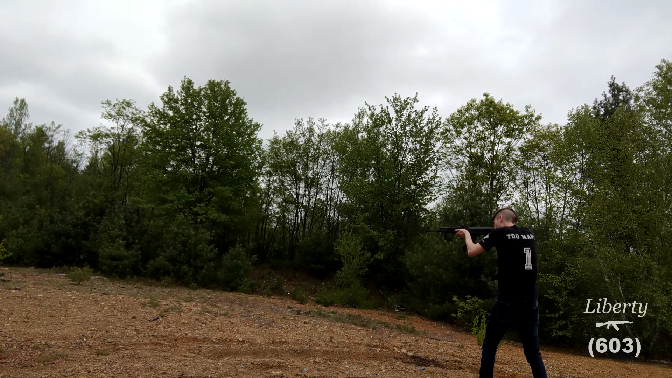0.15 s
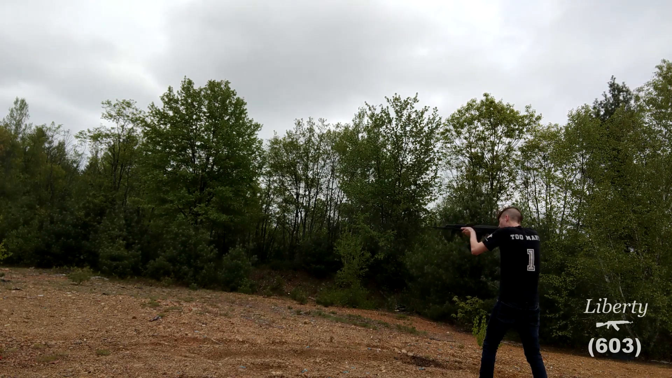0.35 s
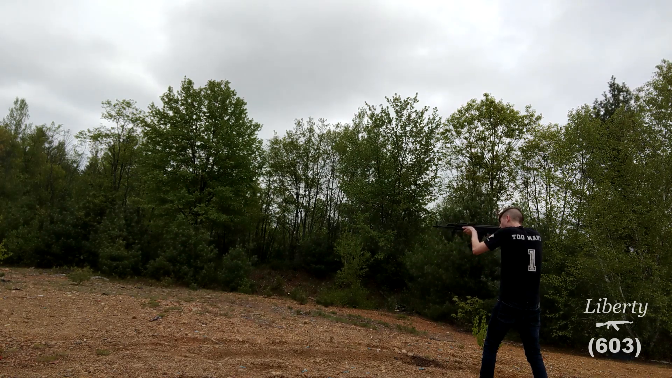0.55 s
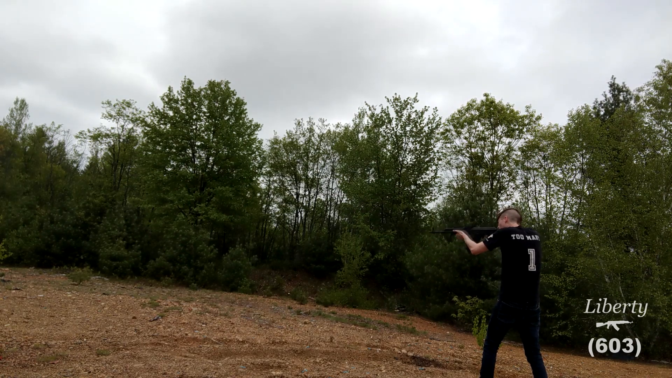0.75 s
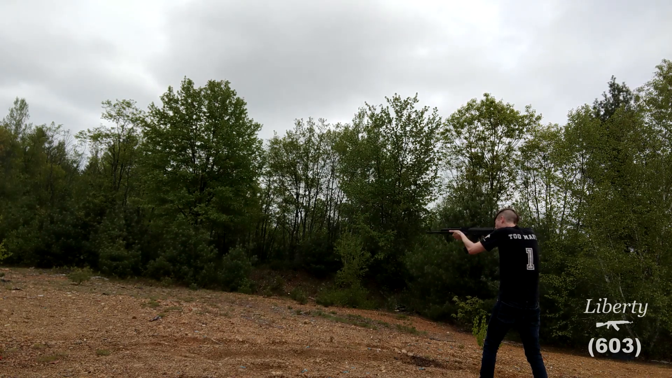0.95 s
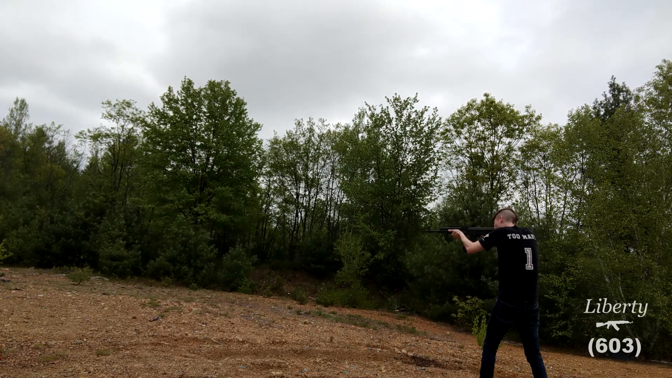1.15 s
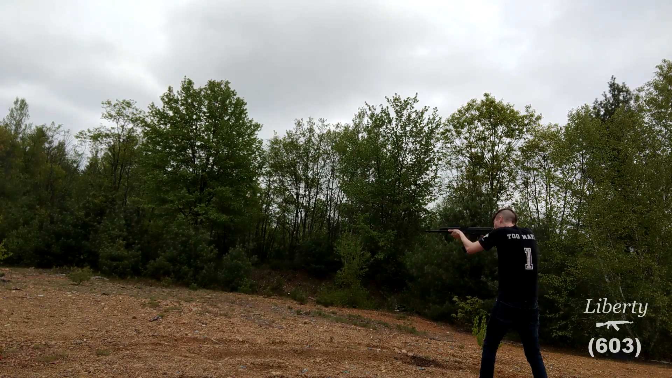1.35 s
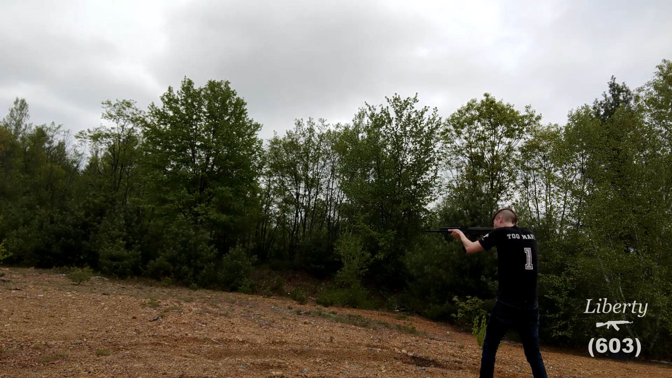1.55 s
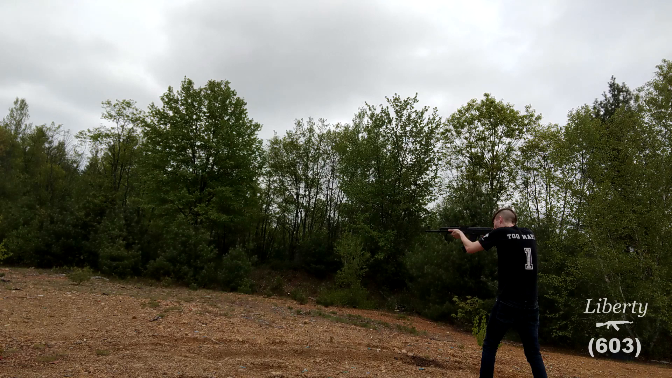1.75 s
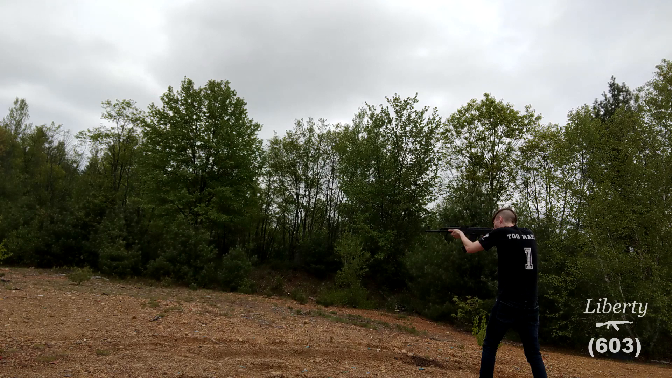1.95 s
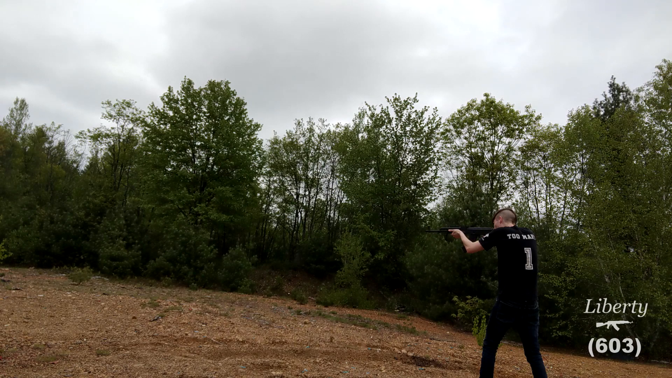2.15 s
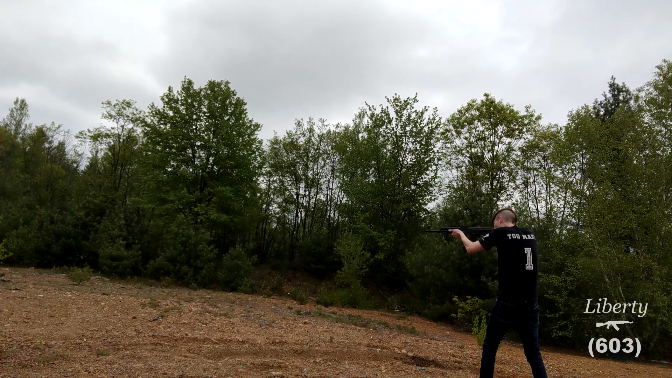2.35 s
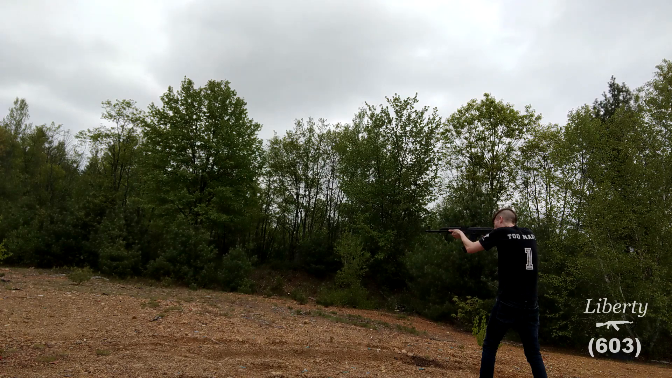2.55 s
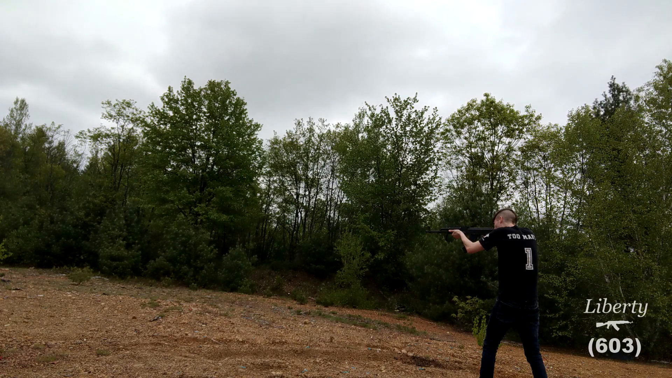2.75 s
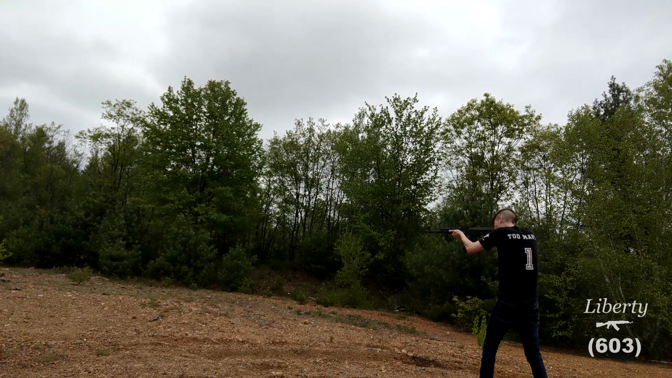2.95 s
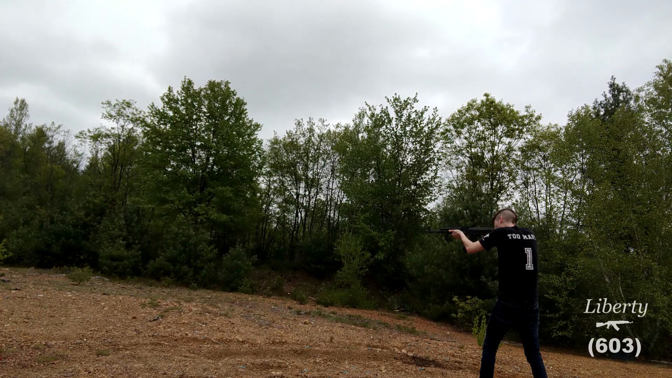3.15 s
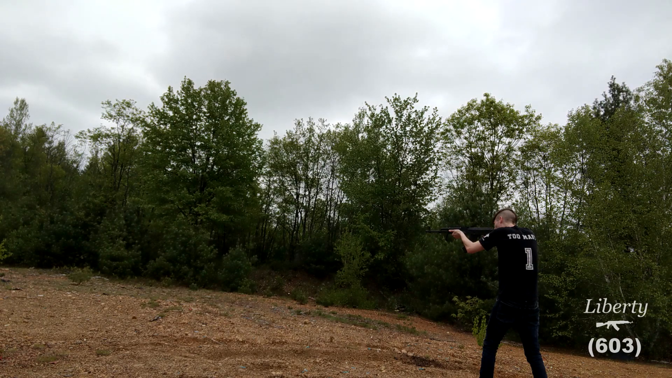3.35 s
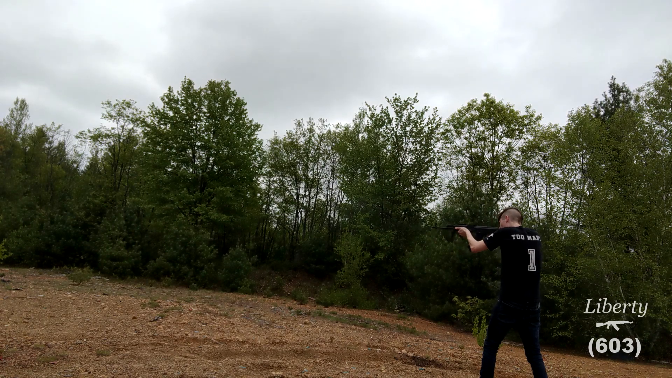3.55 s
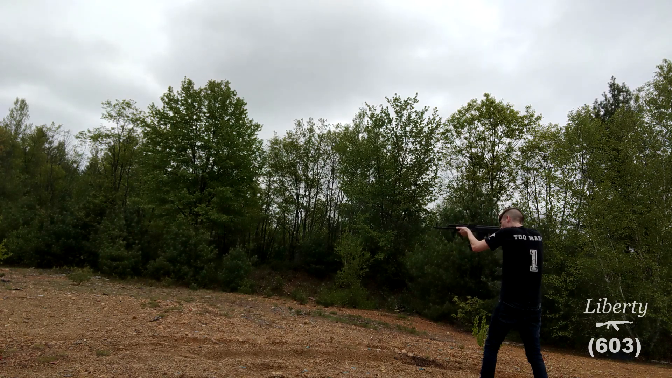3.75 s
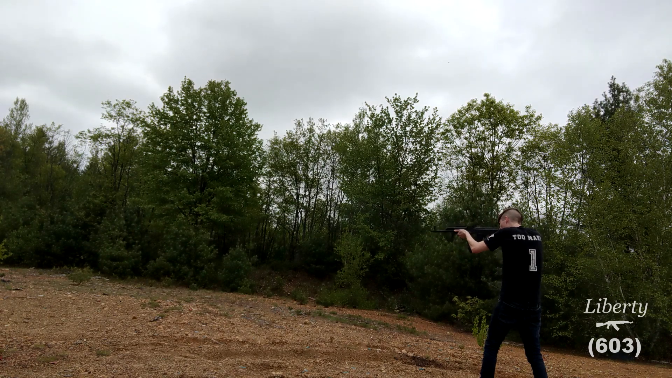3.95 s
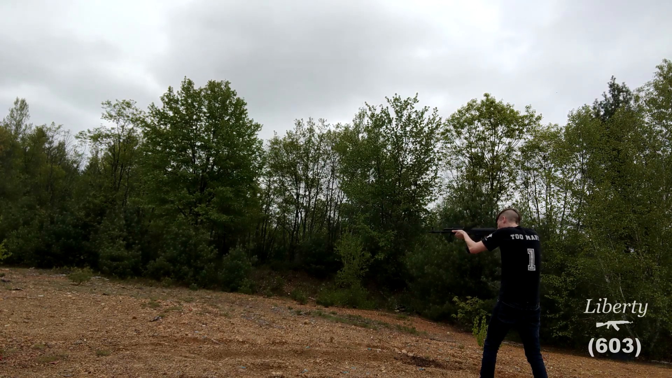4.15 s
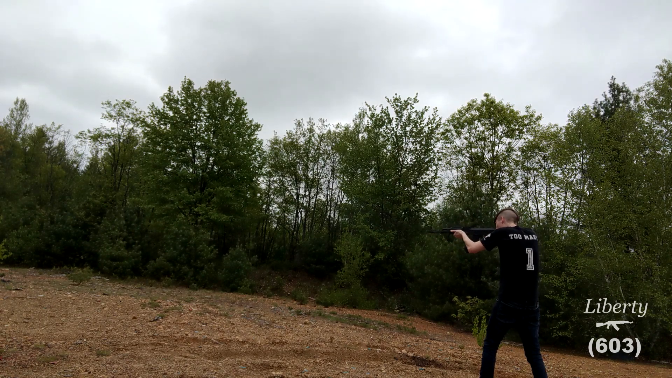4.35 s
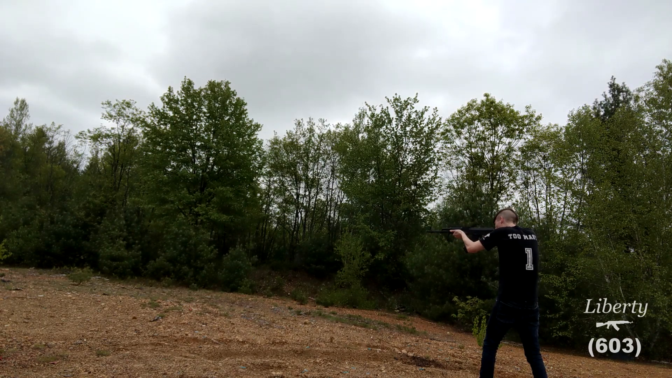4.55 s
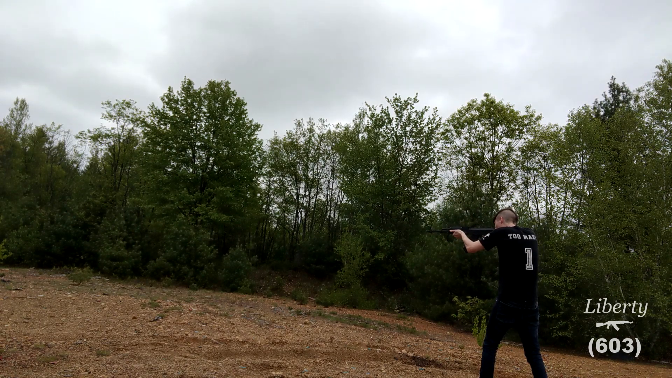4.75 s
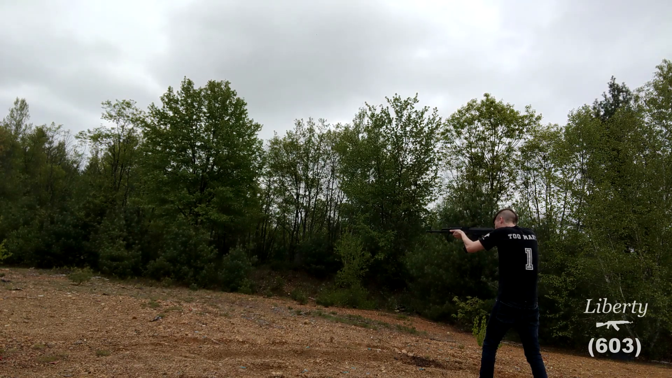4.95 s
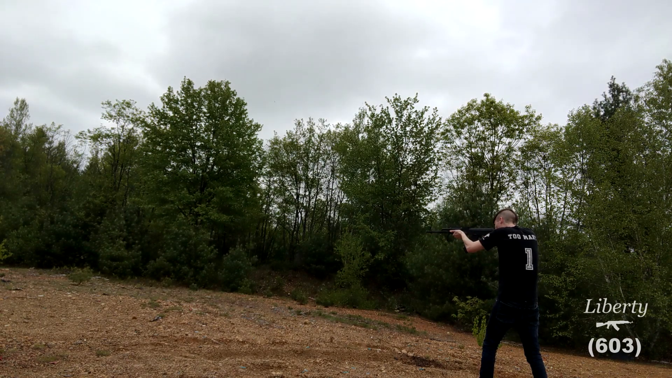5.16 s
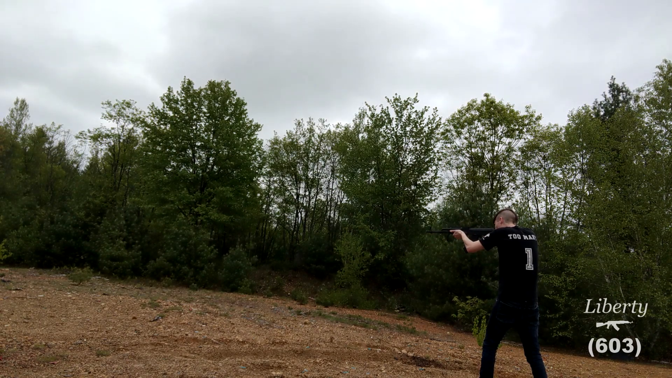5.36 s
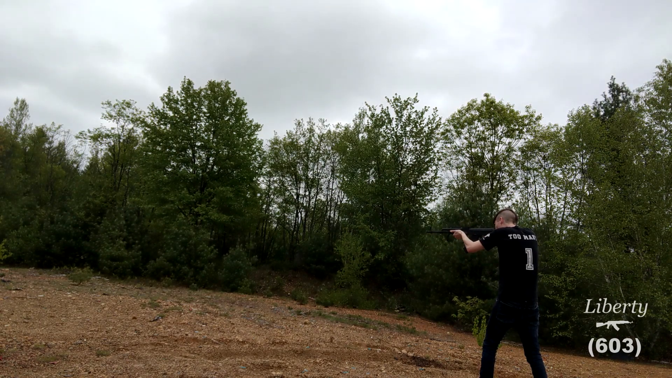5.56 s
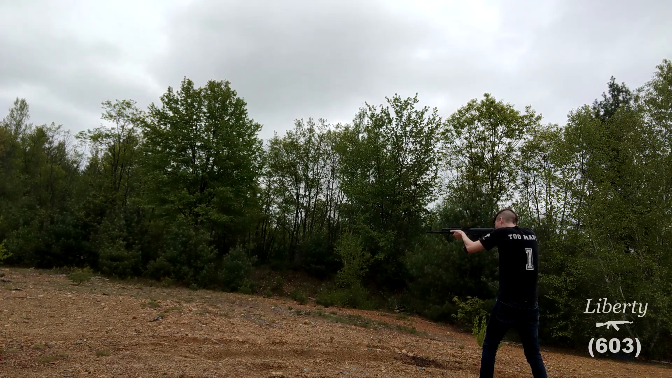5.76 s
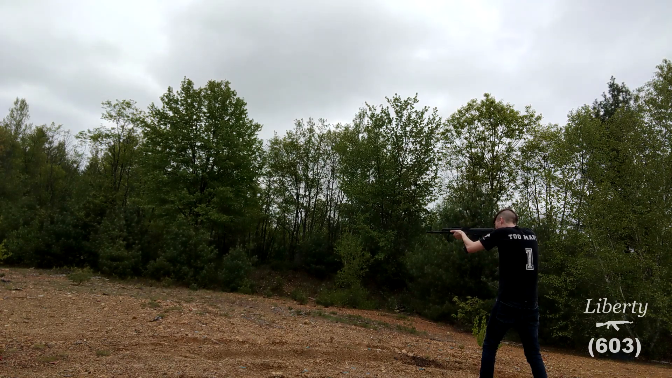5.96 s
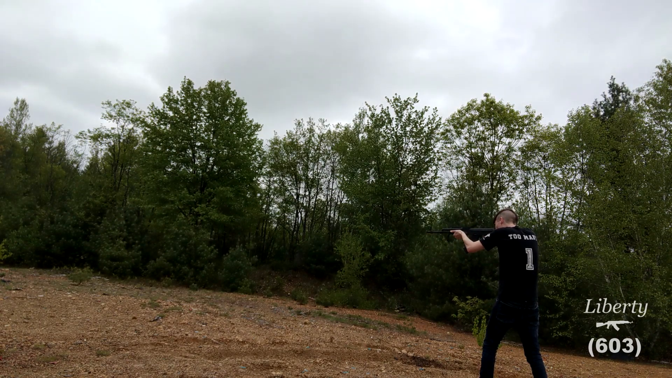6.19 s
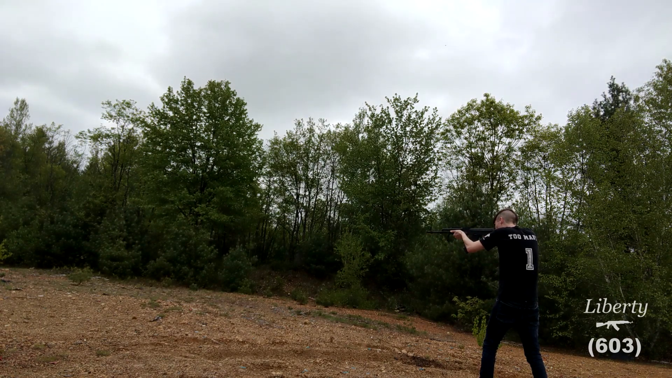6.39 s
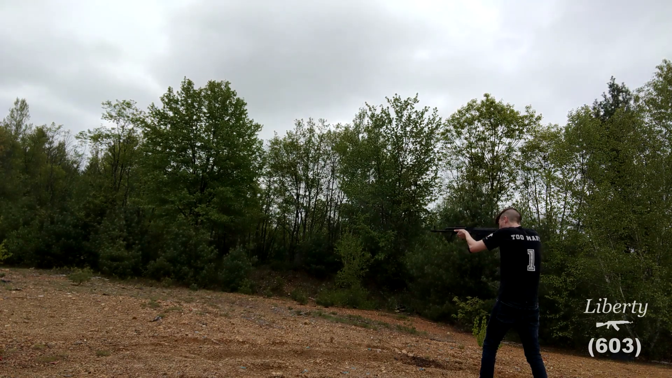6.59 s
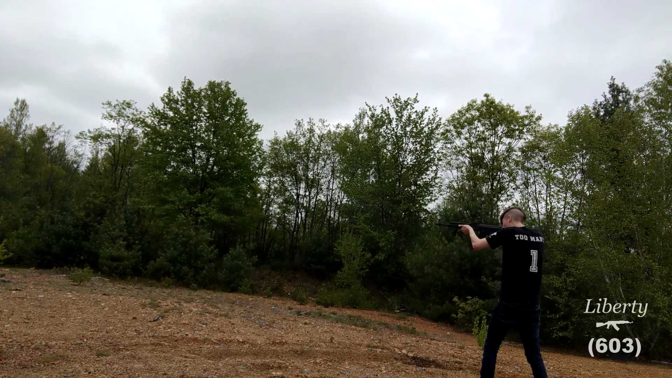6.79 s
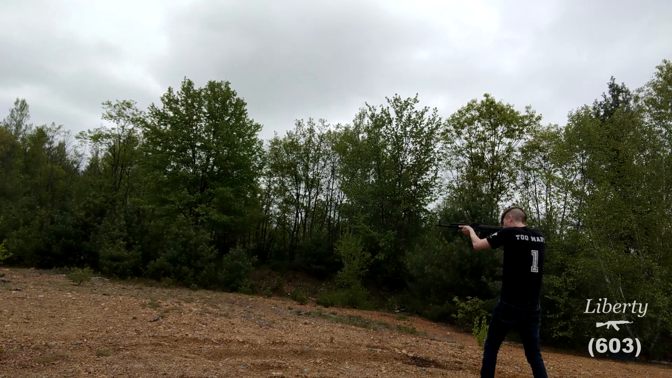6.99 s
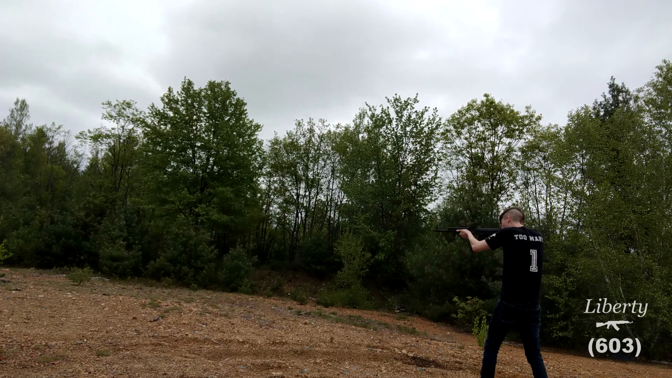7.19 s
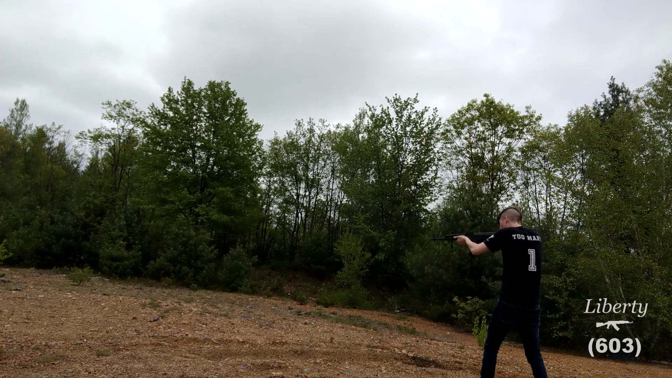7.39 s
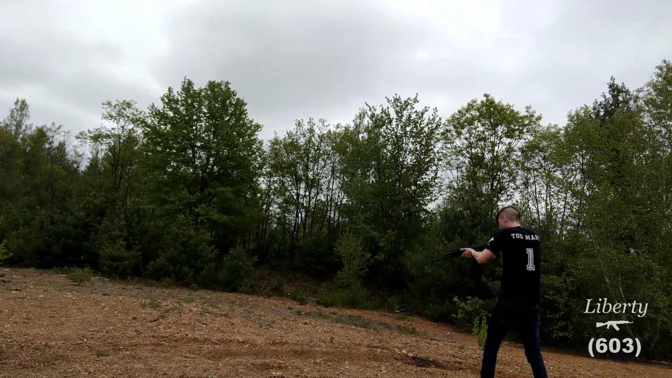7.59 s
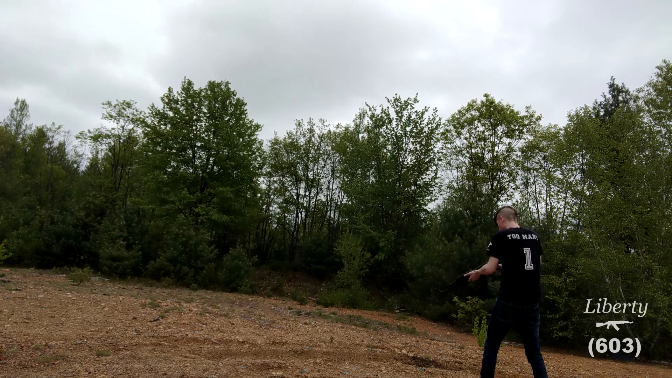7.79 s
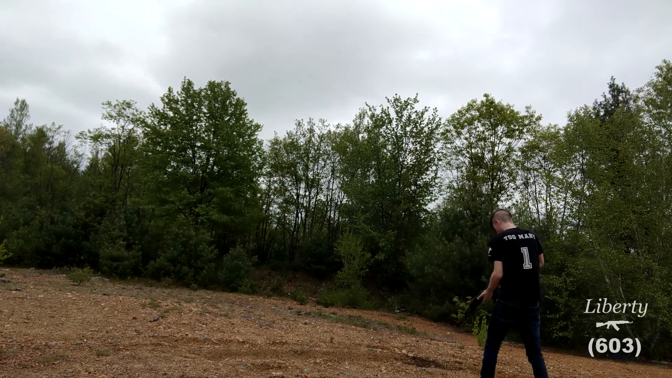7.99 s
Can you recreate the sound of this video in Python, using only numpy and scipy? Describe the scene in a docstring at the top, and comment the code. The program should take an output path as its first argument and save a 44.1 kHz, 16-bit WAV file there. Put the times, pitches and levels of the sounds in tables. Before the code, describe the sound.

Three single rifle shots sound on a gravel range surrounded by forest, a few metres from a small microphone that overloads on each blast. The first comes at about 0.3 seconds and the second at 3.5, both with a low thump; the third, at 6.6, has less bass. Each slaps back at once from an earth bank with a thin snap, scatters in the trees, then rolls away over distant hills for two to three seconds, with dull knocks in the echo.

About a second after each shot, a spent brass case bounces on the stones with a faint, high tinkle: around 1.5 seconds, from 4.6 to 4.9, and at 7.6 and 8.0. Soft low bumps fall at 1.2 and 4.5 seconds, and a small dry click at 5.3. A faint, steady outdoor hush lies underneath throughout.

```python
"""A gravel range ringed by forest: three rifle shots, a few metres from a small microphone that overloads.
Each blast slaps back from an earth bank, scatters in the tree line and the woods, and rolls away over
far hills. About a second later the spent brass case tinkles on the stones.
Two soft bumps, a dry click and a faint outdoor hush lie underneath."""
import sys
import numpy as np
from scipy import signal
from scipy.fft import rfft, irfft
from scipy.io import wavfile
from scipy.ndimage import uniform_filter1d, map_coordinates

SR = 44100
rng = np.random.default_rng(int(sys.argv[2]) if len(sys.argv) > 2 else 0)


def generate_wav(signal):
    """Clip the signal to [-1, 1] and save it as 16-bit WAV at the path in sys.argv[1]."""
    frames = np.transpose(np.atleast_2d(signal))
    scaled = np.clip(frames, -1, 1) * 32767
    pcm = np.round(scaled).astype(np.int16)
    wavfile.write(sys.argv[1], SR, pcm)


N = 354105
TIME = np.arange(N) / SR

# The breeze carries each shot differently: (time [s], blast gain [dB], boom gain [dB],
# woods gain [dB], woods lag [s], hills gain [dB], hills tilt [dB/octave])
SHOTS = [(.3180, -4.5, 1.5, 3, .004, 2.5, 0.18), (3.5081, -3.5, 4.5, -1, .03, 0.5, -0.5),
         (6.6306, -4.5, -11.5, -2, .05, 0, -1.15)]
# Microphone housing resonances and notches: (frequency [Hz], gain [dB])
HOUSING_RESPONSE = [(500, -0.5), (950, -2), (1220, 1), (1500, -1), (1800, 2), (2050, 0), (2300, 0),
                    (3600, 0), (4150, -2), (5000, 0.5), (7200, 0.5), (8100, -2), (9000, 1.5), (10500, -1)]


def rifle(shared_power=0.56, hammer_lead_s=.0067):
    """Every shot meets the same landscape, so its echoes repeat in part; moving air changes the rest."""
    out, age = np.zeros(N), np.arange(4 * SR) / SR
    landscape = scatter(age, lumpy_db=2.5)
    for start, blast_db, boom_db, *far_settings in SHOTS:
        moving_air = scatter(age, lumpy_db=1.0)
        grain = np.sqrt(shared_power) * landscape + np.sqrt(1 - shared_power) * moving_air
        grain = coloured(grain, HOUSING_RESPONSE)
        add(out, start - hammer_lead_s, hammer())
        add(out, start, amp(blast_db) * muzzle_blast(age, grain) + amp(boom_db) * boom(age))
        echoes = near_echoes(age, grain) + far_echoes(age, grain, *far_settings)
        add(out, start, air_absorption(echoes))
        add(out, start, crack_echo())
    return out


# (frequency [Hz], relative level [dB])
BLAST_SPECTRUM = [(30, -22), (100, -3.5), (220, -2.5), (330, -1.5), (420, 3), (560, -8.5), (700, 3),
                  (900, -2), (1150, -3.5), (1500, -9.5), (2500, -9.5), (3600, -9.5), (4300, -13.5),
                  (7000, -11), (10000, -16.5), (15000, -23.5)]


def muzzle_blast(age, grain, gain_db=9.5, hold_s=.012, db_per_doubling=9, fall_db_per_s=88):
    """The blast holds briefly, then its ground scatter weakens with every doubling of its path."""
    late = np.maximum(age, hold_s)
    spreading_db = db_per_doubling * np.log2(late / hold_s)
    decay_db = fall_db_per_s * (late - hold_s)
    return amp(gain_db - spreading_db - decay_db) * coloured(grain, BLAST_SPECTRUM)


# (frequency [Hz], relative level [dB], time to peak [s])
MIC_SWINGS = [(57.3, -3, 0.0068), (106, -4, 0.0071)]


def boom(age):
    """The pressure wave leaves the microphone swinging for a few low cycles, suction first."""
    return -sum(amp(db) * pulse(age / peak_s) * np.sin(2 * np.pi * hz * age)
                for hz, db, peak_s in MIC_SWINGS)


def hammer(level_db=-21.5, t60_s=0.019):
    """The hammer strikes the firing pin just before the bullet leaves."""
    steel = [(200, -20), (1200, -0.5), (2500, 2.5), (5000, -15.5), (9000, -12.5), (15000, -19)]
    return burst(np.arange(SR // 20) / SR, level_db, t60_s, steel)


# Reflectors: (surface, delay [s], relative level [dB], rise [s], hold [s], fall [dB/s])
REFLECTORS = [("bank", .054, -5, 0.0064, 0.0054, 420), ("bank", 0.061, -16, .006, 0.021, 90),
              ("trees", 0.097, -10, 0.023, 0.053, 400), ("trees", .147, -8.5, 0.0063, 0.009, 290),
              ("trees", 0.2, -19, .008, 0.078, 68), ("thicket", 0.17, -13, 0.033, 0.018, 33.8),
              ("woods", 0.3, -11.5, 0.062, 0.068, 55), ("woods", 0.69, -44, .15, .05, 26),
              ("hills", .45, -20, .06, 0.2, 17.9), ("hills", 1.45, -36, .22, .15, 7.8)]


def echo_envelope(age, surface):
    """Each echo from one kind of surface rises, holds and dies away; their powers add."""
    power = np.zeros(len(age))
    for name, delay_s, db, rise_s, hold_s, fall_db_per_s in REFLECTORS:
        if name == surface:
            t = age - delay_s
            onset = np.clip(t / rise_s, 0, 1)
            decay_db = fall_db_per_s * np.maximum(t - rise_s - hold_s, 0)
            power += (onset * amp(db - decay_db)) ** 2
    return np.sqrt(power)


# Near echo spectra: (frequency [Hz], relative level [dB])
BANK_SPECTRUM = [(30, -14), (140, -13), (320, -12), (650, 2.5), (1300, 0), (2600, 0.5), (4500, -1),
                 (7000, -2.5), (10000, -4), (15000, -18)]
TREES_SPECTRUM = [(25, -29), (70, -18), (150, -7), (340, -5.5), (500, 5), (700, 4), (900, 0), (1400, -2.5),
                  (2600, -1.5), (4400, -13), (7000, -12.5), (10000, -16), (15000, -26.5)]


def near_echoes(age, grain):
    """The blast slaps back from the earth bank and scatters in the tree line."""
    bank = echo_envelope(age, "bank") * coloured(grain, BANK_SPECTRUM)
    trees = echo_envelope(age, "trees") * coloured(grain, TREES_SPECTRUM)
    return bank + trees


# Far echo spectra: (frequency [Hz], relative level [dB])
WOODS_SPECTRUM = [(25, -33.5), (70, -24.5), (150, -25.5), (320, -12.5), (620, -12), (1150, 4), (2000, 0.5),
                  (3300, 1), (4400, 0.5), (6500, -0.5), (9000, -7), (15000, -23.5)]
HILLS_SPECTRUM = [(25, -37), (60, -26), (130, -12), (220, -3.5), (320, 2), (500, 0.5), (750, -1),
                  (1150, -1.5), (2000, -5), (3300, -8.5), (4500, -13.5), (7000, -24), (12000, -38)]


def far_echoes(age, grain, woods_db, woods_lag_s, hills_db, tilt_db_per_octave):
    """Thicket, woods and hills return a long roll that comes in uneven waves."""
    deep_woods = amp(woods_db) * echo_envelope(age - woods_lag_s, "woods")
    woods = np.hypot(echo_envelope(age, "thicket"), deep_woods) * coloured(grain, WOODS_SPECTRUM)
    tilted = [(hz, db + tilt_db_per_octave * np.log2(hz)) for hz, db in HILLS_SPECTRUM]
    hills = amp(hills_db) * echo_envelope(age, "hills") * coloured(grain, tilted)
    return flutter(age) * (woods + hills)


def flutter(age, depth_db=0.75, knots_per_s=22):
    """A smooth random gain."""
    knots = rng.standard_normal(400)
    return amp(depth_db * map_coordinates(knots, [age * knots_per_s], mode="wrap"))


def air_absorption(x, db_per_s_at_1khz=3.0, exponent=1.11):
    """Later sound has travelled farther and lost more treble."""
    hz, age, spectra = signal.stft(x, SR, nperseg=256)
    loss_db = db_per_s_at_1khz * age * (hz[:, None] / 1000) ** exponent
    return signal.istft(spectra * amp(-loss_db), SR, nperseg=256)[1][:len(x)]


# (frequency [Hz], relative level [dB])
CRACK_SPECTRUM = [(500, -21.5), (2500, -5.5), (4500, -7.5), (6000, 3), (8000, -4.5), (15000, -17.5)]


def crack_echo(delay_s=.1058, level_db=-2, t60_s=0.021):
    """One hard surface returns the report as a thin, sharp snap."""
    snap = burst(np.arange(SR // 20) / SR, level_db, t60_s, CRACK_SPECTRUM)
    return np.pad(snap, (round(delay_s * SR), 0))


# (delay [s], level [dB])
SLOPE_ECHOES = [(.508, -34), (.660, -21), (1.034, -23.5)]
# (frequency [Hz], relative level [dB])
KNOCK_SPECTRUM = [(60, -37), (180, -6), (300, 11.5), (500, -2), (900, -29), (2500, -25), (6000, -61),
                  (10000, -100)]


def slope_echoes(peak_s=0.0062):
    """Far slopes each return one dull knock, the same for every shot."""
    out, t = np.zeros(N), np.arange(SR // 5) / SR
    for delay_s, db in SLOPE_ECHOES:
        knock = amp(db) * pulse(t / peak_s) * noise(len(t), KNOCK_SPECTRUM)
        for start, *_ in SHOTS:
            add(out, start + delay_s, knock)
    return out


# (time [s], tick level [dB], ring level [dB], ring frequency [Hz])
CASE_LANDINGS = [(1.476, -46.5, -62, 12100), (1.617, -42.5, -44, 12260), (4.630, -46, -72, 12250),
                 (4.687, -37, -43, 12330), (4.912, -57, -64, 12450), (7.56, -32.5, -38, 13170),
                 (7.984, -45, -43.5, 13200)]
# Brass on stone: (frequency [Hz], relative level [dB])
TICK_SPECTRUM = [(2500, -30), (5000, 0), (7200, 9), (8500, -5), (9700, -10), (12500, -3), (16000, -20)]


def spent_cases(tick_t60_s=0.021, ring_t60_s=0.12, twin_t60_s=.5, twin_db=-18, split_hz=24):
    """A case ticks on a stone; its mouth rings, wavering as it tumbles, and a weak twin mode lingers."""
    out, t = np.zeros(N), np.arange(SR // 2) / SR
    for start, tick_db, ring_db, hz in CASE_LANDINGS:
        tick = burst(t, tick_db, tick_t60_s, TICK_SPECTRUM)
        waver_rad = .7 * noise(len(t), [(100, 0), (600, -40), (3000, -90)])
        phase = 2 * np.pi * hz * t + waver_rad
        ring = amp(-60 * t / ring_t60_s) * np.sin(phase)
        twin = amp(twin_db - 60 * t / twin_t60_s) * np.sin(phase + 2 * np.pi * split_hz * t)
        add(out, start, tick + amp(ring_db) * (ring + twin))
    return out


# (time [s], level [dB])
SOFT_BUMPS = [(1.220, -26.5), (4.484, -29)]
DRY_CLICKS = [(5.325, -43.5)]


def bumps_and_click(bump_t60_s=0.091, click_t60_s=0.027):
    """Soft low bumps and a dry click under the fading echoes."""
    out, t = np.zeros(N), np.arange(SR // 4) / SR
    bump_spectrum = [(25, -16), (60, -4), (130, 0), (300, -13), (1500, -60), (5000, -90)]
    click_spectrum = [(1200, -23), (3200, 8), (5500, -4.5), (9000, -28)]
    for start, db in SOFT_BUMPS:
        add(out, start, burst(t, db, bump_t60_s, bump_spectrum))
    for start, db in DRY_CLICKS:
        add(out, start, burst(t, db, click_t60_s, click_spectrum))
    return out


# (frequency [Hz], relative level [dB])
HUSH_SPECTRUM = [(15, -47.5), (25, -18), (43, -7), (64, -1.5), (116, -13), (156, -5), (233, -17.5),
                 (359, -13.5), (1050, -25), (1240, -21), (15500, -33.5)]


def outdoor_hush(before_db=-64.5, after_db=-58.5):
    """Faint hush and hiss, stronger from the first shot on."""
    level_db = np.where(TIME > SHOTS[0][0], after_db, before_db)
    return amp(level_db) * noise(N, HUSH_SPECTRUM)


def scatter(age, lumpy_db):
    """Countless small reflections, bunched into millisecond lumps of uneven strength."""
    knots = rng.standard_normal(len(age) // 64 + 2)
    lumps = np.interp(np.linspace(0, len(knots) - 1, len(age)), np.arange(len(knots)), knots)
    return unit(rng.standard_normal(len(age)) * amp(lumpy_db * lumps))


def amp(db):
    """Decibels to gain."""
    return 10 ** (np.asarray(db) / 20)


def unit(x):
    """Scale to rms 1."""
    return x / np.sqrt(np.mean(x ** 2) + 1e-20)


def coloured(x, spectrum):
    """x shaped by (frequency [Hz], gain [dB]) points on a log axis, at rms 1."""
    points_hz, points_db = np.transpose(spectrum)
    hz = np.fft.rfftfreq(len(x), 1 / SR)
    gain_db = np.interp(np.log(hz + 1), np.log(points_hz), points_db)
    return unit(irfft(rfft(x) * amp(gain_db), len(x)))


def noise(samples, spectrum):
    """Coloured noise at rms 1."""
    return coloured(rng.standard_normal(samples), spectrum)


def burst(t, level_db, t60_s, spectrum):
    """Coloured noise with an exponential decay."""
    return amp(level_db - 60 * t / t60_s) * noise(len(t), spectrum)


def pulse(u):
    """Envelope that rises to 1 at u = 1, then decays."""
    return u * np.exp(1 - u)


def add(out, start_s, x):
    """Mix x into out from start_s on."""
    part = out[round(start_s * SR):][:len(x)]
    part += x[:len(part)]


# Level dips: (start [s], end [s])
LULLS = [(2.82, 3.49), (5.88, 6.61)]


def scene(lull_db=-4.0):
    """All sources in mono; the level dips before the second and third shots."""
    mix = rifle() + slope_echoes() + spent_cases() + bumps_and_click() + outdoor_hush()
    in_lull = sum(1. * ((TIME > start) & (TIME < end)) for start, end in LULLS)
    lull = uniform_filter1d(in_lull, size=900)  # 20 ms ramps
    return (mix * amp(lull_db * lull))[None]


def record(dry, hardness=8, low_cut_hz=38, ceiling_db=-.4, top_hz=15800):
    """The microphone drops the deepest bass; the input stage flattens the blast and limits the band."""
    sound = signal.sosfilt(signal.butter(3, low_cut_hz, "high", fs=SR, output="sos"), dry)
    clipped = sound / (1 + np.abs(sound / amp(ceiling_db)) ** hardness) ** (1 / hardness)
    return signal.sosfilt(signal.ellip(12, .1, 90, top_hz, fs=SR, output="sos"), clipped)


dry = scene()
out = record(dry)
generate_wav(out)
```